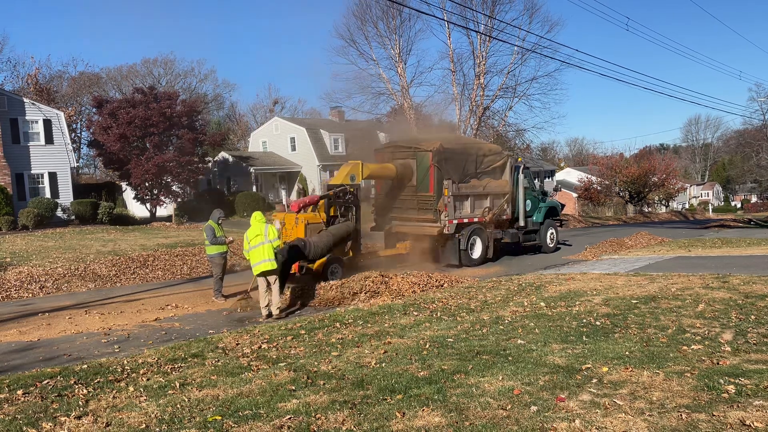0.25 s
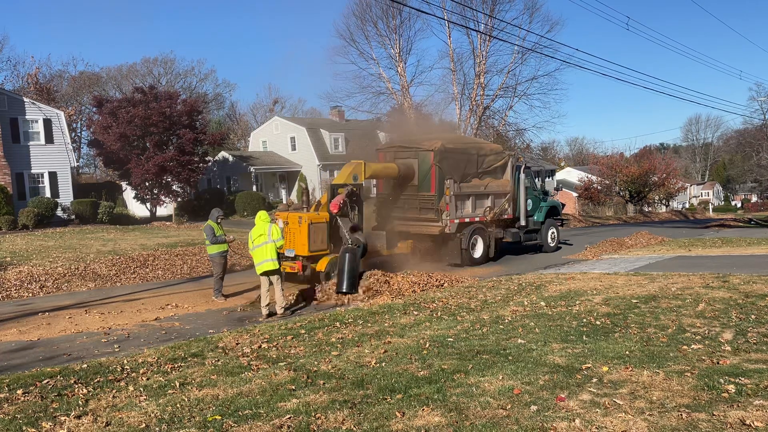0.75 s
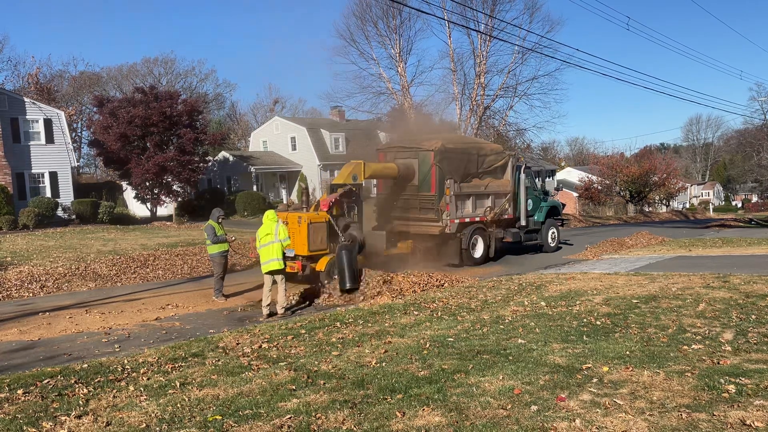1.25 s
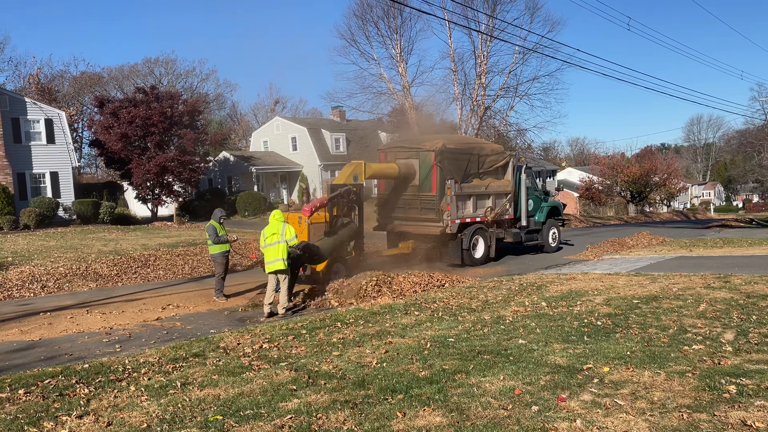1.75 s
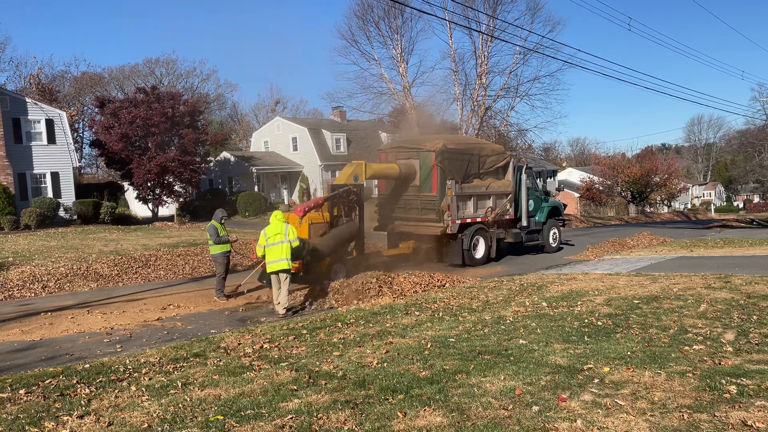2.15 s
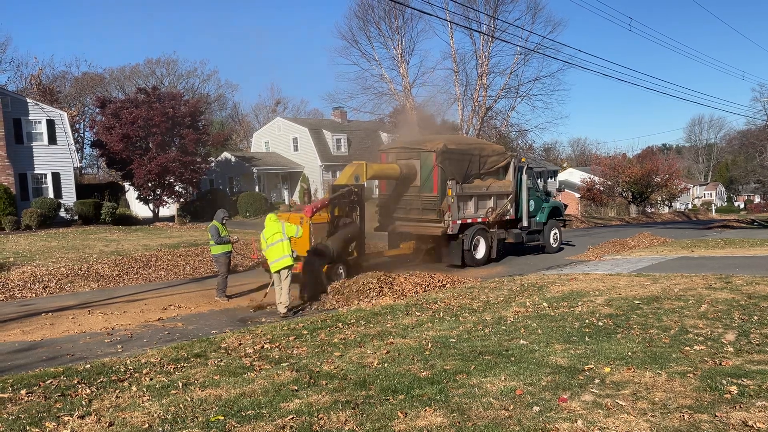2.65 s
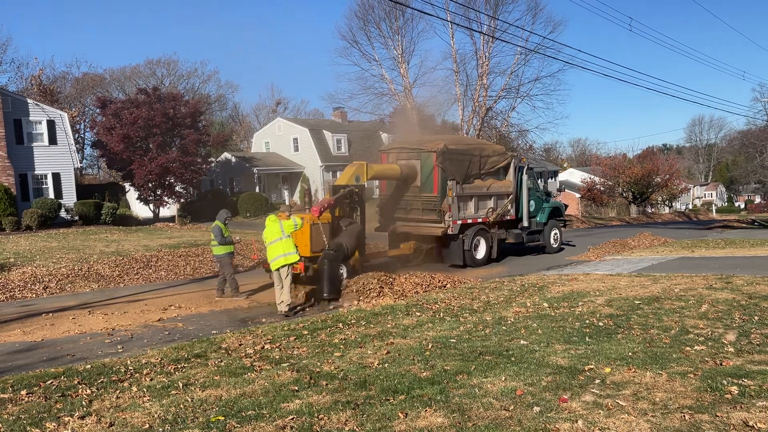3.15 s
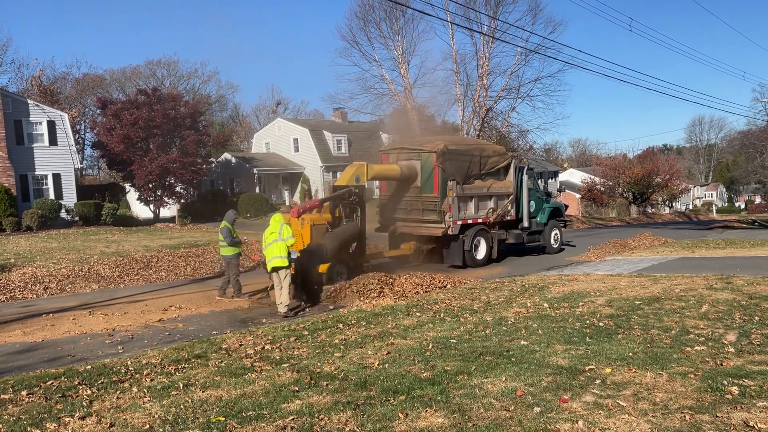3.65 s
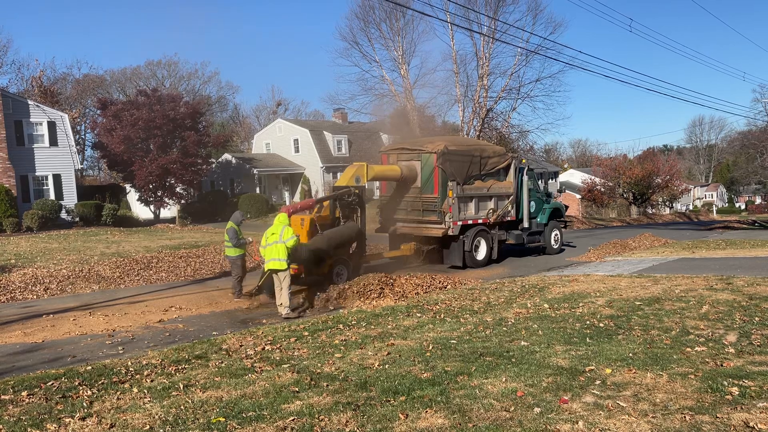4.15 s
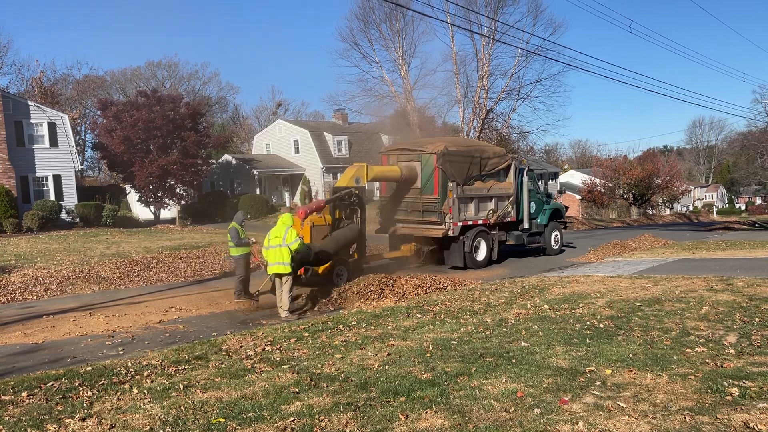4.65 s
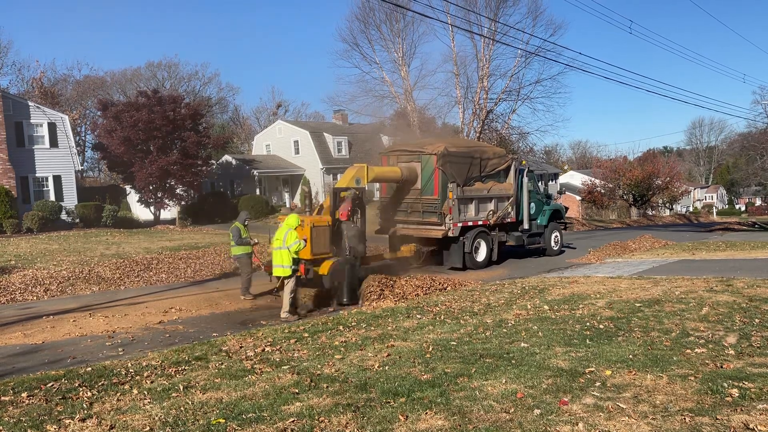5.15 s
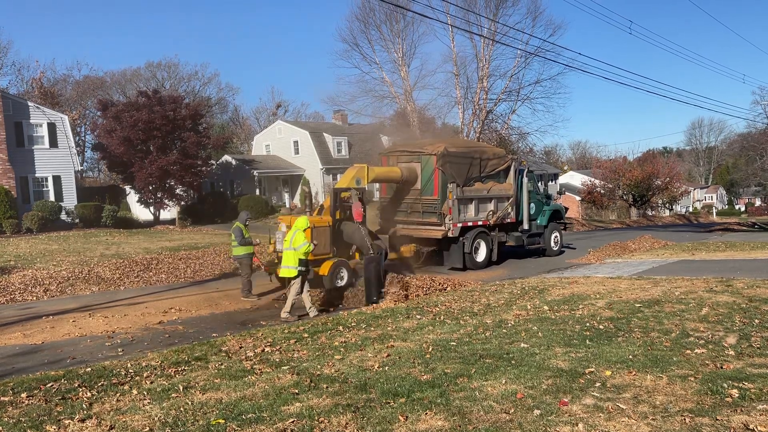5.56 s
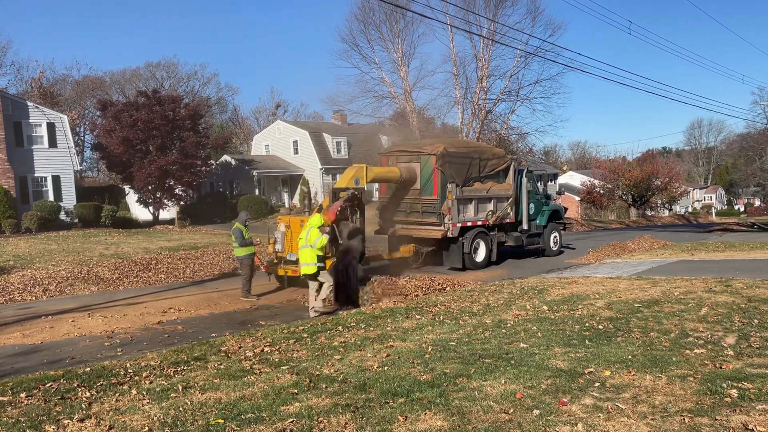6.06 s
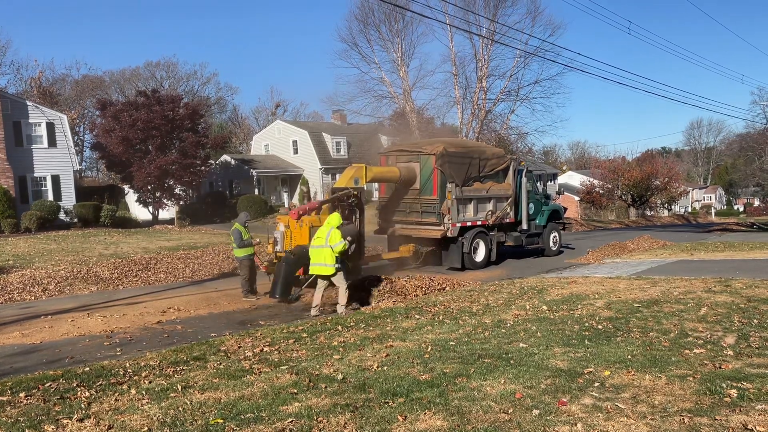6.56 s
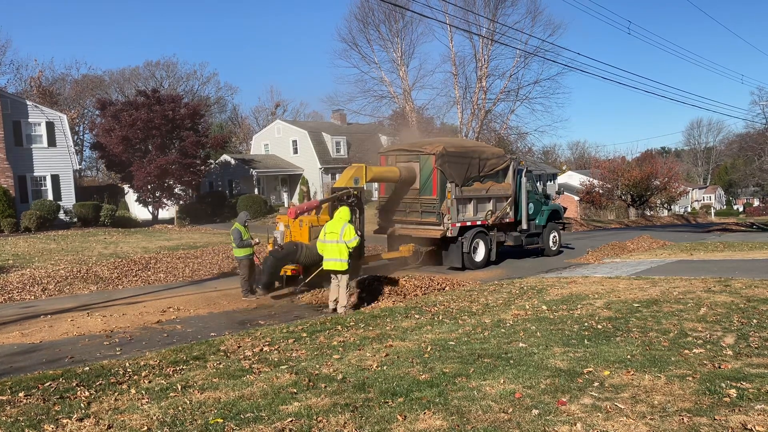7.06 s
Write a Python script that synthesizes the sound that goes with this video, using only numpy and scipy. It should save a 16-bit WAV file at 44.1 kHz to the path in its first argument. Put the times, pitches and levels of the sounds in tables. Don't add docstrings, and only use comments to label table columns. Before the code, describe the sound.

A diesel leaf vacuum runs continuously outdoors, heard across a lawn on an unprotected stereo phone microphone. Its low, buzzing engine hum stays nearly constant, sagging very slightly around 1.3 to 2 seconds and again near 6, beneath a broad, rough fan roar. At 0 to 0.1 seconds a cluster of hard wind slaps strikes the microphone; more thumps follow at 0.3 to 0.5 and around 1.2 to 1.9. Gusts swell again from 2.5 to 3.9, with a heavy slap near 3.3, then the wind mostly settles into low rumble, with thumps near 4.7 and 5.7. Dry leaves rush through the hose with grainy, dusty hiss, fuller around 0.35, 1.65, 2.6, 3.75, 5 and 6.1, thinner near 2.25 and 4.5, fading by 7.1. Twigs tick sharply on metal, busiest at 1.4 to 2 and around 5.9. The roar continues until the end at about 7.3.

```python
import sys
import numpy as np
from scipy import signal
from scipy.fft import rfft, irfft, next_fast_len
from scipy.io import wavfile
from scipy.ndimage import uniform_filter1d, minimum_filter1d

SR = 44100
rng = np.random.default_rng(int(sys.argv[2]) if len(sys.argv) > 2 else 0)


def waveform_to_disk(signal):
    frames = np.transpose(np.atleast_2d(signal))
    scaled = np.clip(frames, -1, 1) * 32767
    samples = np.round(scaled).astype(np.int16)
    wavfile.write(sys.argv[1], SR, samples)


def natural_amplitude(level_db):
    exponent = np.asarray(level_db, float) / 20
    return 10 ** exponent


N = 322371
FAST = next_fast_len(N)
HZ = np.maximum(np.arange(FAST // 2 + 1) * SR / FAST, 1)
TOP_HZ = 15900


def level(x, db):
    return x * natural_amplitude(db) / np.sqrt(np.mean(x ** 2))


def columns(table):
    s, *rest = np.transpose(table)
    return [np.interp(np.arange(N) / SR, s, c) for c in rest]


def on_hz(table):
    f, *rest = np.transpose(table)
    return [np.interp(np.log(HZ), np.log(f), c) for c in rest]


def back(spec):
    return irfft(spec, FAST)[..., :N]


def colour(x, table):
    return back(rfft(x, FAST) * natural_amplitude(on_hz(table)[0]))


def walk(rate):
    hold = int(SR / rate)
    steps = np.repeat(rng.standard_normal(N // hold + 1), hold)
    return 1.15 * uniform_filter1d(uniform_filter1d(steps, hold), hold)[:N]


def restless(x, lo_hz, shared_db, own_db, rate):
    spec, shared, out = rfft(x, FAST), walk(rate), 0
    within = np.clip(HZ, lo_hz, 32 * lo_hz)
    for hz in lo_hz * 2. ** np.arange(6):
        share = np.cos(np.clip(np.log2(within / hz), -1, 1) * np.pi / 2) ** 2
        out = out + back(spec * share) * natural_amplitude(shared_db * shared + own_db * walk(rate))
    return out


def add(out, s, burst):
    i = int(s * SR)
    out[..., i:i + burst.shape[-1]] += burst[..., :N - i]


SLAP_RISE_MS = 5.94
# (time [s], peak level [dB], centre frequency [Hz])
AIR_SLAPS = [(0.004, -4.5, 420), (0.03, -4.5, 500), (0.046, -4.5, 480), (0.066, -7, 594), (0.275, -11, 360),
             (0.365, -11.5, 248), (0.455, -10.5, 340), (0.505, -7, 390), (0.793, -16, 256),
             (1.238, -12.5, 245), (1.397, -10.5, 258), (1.45, -21, 256), (1.472, -7.5, 254),
             (1.577, -11.5, 252), (1.66, -13, 244), (1.901, -13.5, 267), (2.451, -14.5, 288),
             (2.528, -8, 292), (2.639, -15, 278), (2.679, -7, 272), (2.822, -16, 250), (2.998, -9, 356),
             (3.26, -4.5, 327), (3.527, -12, 400), (3.554, -9.5, 415), (3.749, -10, 254), (3.857, -15, 255),
             (4.687, -14.5, 246), (5.694, -10, 270), (5.73, -26, 277)]


def slaps():
    out = np.zeros(N)
    t = np.arange(int(.09 * SR)) / SR
    age = t * 1000 / SLAP_RISE_MS
    for s, db, hz in AIR_SLAPS:
        b, a = signal.butter(2, [hz / 1.38, hz * 1.32], "band", fs=SR)
        eddy = signal.lfilter(b, a, rng.standard_normal(len(t))) * age * np.exp(1 - age)
        add(out, s, natural_amplitude(db) * eddy / np.abs(eddy).max())
    return out


def wake():
    width_s = 0.025
    first_gust_s, first_gust_db = 0.099, -11.5
    t = np.arange(0, N, 64) / SR
    power = natural_amplitude(2 * first_gust_db) * np.clip((first_gust_s - t) / 0.0049, 0, 1)
    for s, db, _ in AIR_SLAPS:
        distance = np.clip((t - s - SLAP_RISE_MS / 1000) / width_s, -9, 9)
        power = power + natural_amplitude(2 * db) * np.exp(-distance ** 2)
    return np.interp(np.arange(N) / SR, t, power)


# (time [s], rumble level [dB])
WIND_GUSTS = [(0, -21), (.5, -18.5), (.9, -19.5), (1.18, -23), (1.45, -18.5), (1.7, -18), (1.85, -22),
              (2.4, -20), (2.9, -15), (3.2, -20.5), (3.75, -16.5), (4.2, -23), (4.8, -21.5), (5.4, -20.5),
              (5.75, -20.5), (6.5, -20.5), (6.76, -24.5), (7.0, -22.5)]
# (frequency [Hz], density [dB per Hz])
RUMBLE_SPECTRUM = [(25, -34), (42, -5), (62, -1), (90, -1), (115, -6), (170, -8), (240, -15), (320, -18),
                   (600, -61.5)]
# (frequency [Hz], density [dB per Hz])
BUFFET_SPECTRUM = [(100, -25), (200, 5.5), (300, -2.5), (480, -3.5), (750, -14), (1000, -19), (1600, -71)]


def wind():
    buffet_under_rumble_db = -8
    wake_rumble_db, wake_buffet_db = -15.5, -11
    gust_db, = columns(WIND_GUSTS)
    near = wake()
    rumble_power = natural_amplitude(2 * gust_db) + near * natural_amplitude(2 * wake_rumble_db)
    buffet_power = natural_amplitude(2 * (gust_db + buffet_under_rumble_db)) + near * natural_amplitude(2 * wake_buffet_db)
    buffet_gain = np.sqrt(np.maximum(buffet_power - natural_amplitude(-26.0) ** 2, 0))
    pair = []
    for _ in range(2):
        rumble = level(colour(rng.standard_normal(N), RUMBLE_SPECTRUM), 1.87)
        rumble = rumble * np.sqrt(rumble_power) * natural_amplitude(2.23 * walk(21))
        buffet = level(colour(rng.standard_normal(N), BUFFET_SPECTRUM), -2.1)
        buffet = buffet * buffet_gain * natural_amplitude(4.9 * walk(40))
        pair.append(rumble + buffet + slaps())
    common = pair[0] * natural_amplitude([[.5], [-.5]])
    opposed = natural_amplitude(-12.5) * pair[1] * np.array([[1], [-1]])
    return common + opposed


# (shaft order, level relative to -18 dB [dB])
SHAFT_ORDERS = [(1, -25), (2, -0.5), (3, -33), (4, 3.5), (5, -55), (6, -13.5), (7, -18), (8, -28), (9, -88),
                (10, -27.5), (11, -26), (12, -24), (14, -67), (15, -50), (17, -35), (18, -20.5), (19, -39),
                (20, -20.5), (21, -32), (22, -25), (23, -27), (24, -26.5)]
# (time [s], shaft speed [turns/s])
SHAFT_SPEED = [(0, 32.4), (.3, 32.33), (.75, 32.22), (1.3, 31.62), (1.7, 31.78), (2.0, 31.68),
               (2.75, 32.33), (3.25, 32.12), (3.75, 32.07), (4.3, 32.17), (4.9, 32.2), (5.3, 32.33),
               (5.6, 32.25), (6.05, 31.74), (6.45, 31.8), (6.9, 32.3), (7.31, 32.22)]
# (time [s], blade passes lost)
IMPELLER_SLIP = [(0, -.45), (.8, 0), (1.5, .5), (2.2, 1.5), (3.45, 2.5), (4.15, 3.5), (5.25, 4), (5.9, 4.5),
                 (6.8, 5.5), (7.31, 5.68)]


def engine():
    speed_wobble, blade_db = .0004, -25.5
    (hz,), (lost,) = columns(SHAFT_SPEED), columns(IMPELLER_SLIP)
    turn = 2 * np.pi * np.cumsum(hz * (1 + speed_wobble * walk(9))) / SR

    def tone(order, db, late=0):
        return np.sqrt(2) * natural_amplitude(db) * np.cos(order * turn - .012 * order ** 2 - late)

    out = tone(6, blade_db, 2 * np.pi * lost)
    for order, db in SHAFT_ORDERS:
        flicker_db = .5 if order in (2, 4, 6) else 1.8
        out = out + tone(order, db - 18.0 + flicker_db * walk(6))
    return out, turn


# (time [s], level [dB])
LEAF_LOAD = [(0, -36), (.09, -52), (.27, -52), (.35, -33), (.55, -38), (1.5, -38.5), (1.65, -33),
             (1.8, -40), (2.25, -47), (2.63, -33), (3.2, -40), (3.75, -35), (4.3, -48), (4.78, -48),
             (4.95, -32.5), (5.6, -37), (6.1, -34.5), (7.1, -52)]
# (frequency [Hz], density [dB per Hz])
FAN_SPECTRUM = [(250, -3.5), (370, -6.5), (470, -10), (630, -0.5), (1000, -10.5), (1450, -4.5), (1750, -11),
                (1950, -6.5), (2300, -15), (2500, -12), (4000, -22), (5300, -30.5), (7000, -32.5),
                (12000, -57)]
# (frequency [Hz], density [dB per Hz])
RUSH_SPECTRUM = [(600, -34), (1300, -8), (2200, -1), (3000, -1.5), (4200, -2), (5300, -7), (6500, -7.5),
                 (9000, -8.5), (12000, -54)]
# (frequency [Hz], density [dB per Hz])
HISS_SPECTRUM = [(3000, -42), (5500, -28.5), (7000, -9), (8500, 6.5), (10000, 0.5), (11500, 1),
                 (13000, -3.5), (14500, 0), (15700, -15)]


def blower(turn):
    hiss_db, = columns(LEAF_LOAD)
    load_db = hiss_db + 36
    roar_db = -27.5 + 0.1047 * load_db
    rush_db = -29.5 + 0.57 * uniform_filter1d(load_db, size=int(2 * .12 * SR))
    chop = 1 + 0.018 * np.cos(2 * turn) + 0.043 * np.cos(turn) + 0.032 * np.cos(3 * turn)
    roar_spectrum = [(70, -53), (170, -3.5)] + FAN_SPECTRUM + [(TOP_HZ, -46)]
    roar = colour(rng.standard_normal((2, N)) * chop, roar_spectrum)
    roar = restless(roar, 440, shared_db=0.0, own_db=0.47, rate=8.2)
    grain_db = rng.exponential(size=N // 40 + 1).repeat(40)[:N]
    grains = rng.standard_normal((2, N)) * natural_amplitude(grain_db)
    rush = restless(colour(grains, RUSH_SPECTRUM), 710, shared_db=-1.0, own_db=2.0, rate=11)
    dust = colour(rng.standard_normal((2, N)), HISS_SPECTRUM)
    hiss = restless(dust, 520, shared_db=-2.0, own_db=1., rate=8)
    loaded = np.sqrt(np.maximum(natural_amplitude(rush_db) ** 2 - natural_amplitude(-39) ** 2, 0))
    return level(roar, 3.46) * natural_amplitude(roar_db) + level(rush, 0.46) * loaded + level(hiss, 0.5) * natural_amplitude(hiss_db)


# (time [s], peak level [dB], relative level of low part [dB])
TWIG_TICKS = [(0.5322, -29, 8), (0.573, -23.5, -1), (0.63, -34, -7), (0.6546, -54, -1), (1.0226, -23.5, 1),
              (1.351, -27, 12), (1.474, -19, -2), (1.5894, -19.5, -3.5), (1.756, -31, 3),
              (1.7748, -25, 10.5), (1.839, -20.5, -1), (1.926, -24, 7), (2.81, -16, -10), (3.049, -23, -7),
              (3.1095, -25, 4), (3.476, -24, 3), (4.002, -22, 1.5), (4.1776, -23, -17), (4.971, -28, -15),
              (5.0559, -28, -15), (2.069, -28, -3), (5.377, -30, -8), (5.432, -28, -5), (5.7335, -24, -6),
              (5.884, -18.5, -3.5), (5.9594, -27, -7), (5.9863, -22, 0.5), (6.0781, -30, -8),
              (6.3674, -32, -7), (6.8927, -26, -10)]


def ticks():
    high, low = np.zeros((2, 2, N))
    t = np.arange(int(.06 * SR)) / SR
    shape = (1 - np.exp(-t / 0.002)) * np.exp(-t / 0.014)
    for s, db, low_db in TWIG_TICKS:
        burst = shape * rng.standard_normal((2, len(t)))
        add(high, s, natural_amplitude(db - 7.0) * burst)
        add(low, s, natural_amplitude(db + low_db + 9.0) * burst)
    bright = colour(high, [(2500, 7), (4500, 10.0), (9000, 7.5), (13000, -24)])
    dull = colour(low, [(700, -4), (1600, -5), (3600, -3.5), (5500, -24)])
    return bright + dull


# (frequency [Hz], right gain [dB], right lead [rad], second path share, unrelated share)
PORT_PAIR = [(50, -1, 0, 0, .1), (430, -1, 0, .1, .4), (650, -6.5, -.4, .85, .55), (1500, -7.5, 0, .75, .6),
             (2200, -4.5, -.2, .3, .5), (3000, -4.5, -.4, .12, .6), (4000, 0, -.2, 0, .3),
             (5300, -3, -1.1, 0, .9), (6000, -4, .2, 0, .8), (7600, -.5, 2.7, 0, .55),
             (8900, 0, 3.7, 0, .5), (10300, .5, 5.5, 0, .6), (12600, 0, 6.7, 0, .5), (13800, 0, 9.0, 0, .5),
             (15900, 0, 9.8, 0, .5)]
CANCELLATIONS = [0, 770, 1540, 2200, 2780, 3400, 4000]


def ports(drone, noise):
    gain_db, lead, second, apart = on_hz(PORT_PAIR)
    cycles = np.interp(HZ, CANCELLATIONS, np.arange(len(CANCELLATIONS)))
    two_paths = 1 - second * np.exp(-2j * np.pi * cycles)
    left, scattered = rfft(drone + noise[0], FAST), rfft(noise[1], FAST)
    related = np.sqrt(1 - apart ** 2) * two_paths * np.exp(1j * lead) * left
    right = natural_amplitude(gain_db) * (related + apart * scattered)
    return back(np.array([left, right]) * (HZ < TOP_HZ))


def scene():
    duck_s, duck_db = .5, -11
    air = wind()
    drone, turn = engine()
    machine = ports(drone, blower(turn) + ticks())
    strength = uniform_filter1d(air[0] ** 2, size=int(duck_s * SR))
    return (machine + air) / np.sqrt(1 + strength / natural_amplitude(2 * duck_db)) * natural_amplitude(2.0)


# (low edge [Hz], high edge [Hz], share of time blocks kept)
EDGE_BANDS = [(7250, 7500, .93), (7500, 7700, .75), (8000, 8800, .06), (8800, 9200, .75), (9200, 9600, .92),
              (12900, 13300, .9), (13300, 13750, .55), (13750, 14100, .06), (14100, 15900, .015)]


def ragged(spec):
    out = 0
    for lo, hi, share in EDGE_BANDS:
        chance = uniform_filter1d(rng.standard_normal(N // 1024 + 2), size=2)
        kept = 1. * (chance < np.quantile(chance, share))
        gate = uniform_filter1d(np.roll(kept.repeat(1024), 751)[:N], size=700)
        out = out + back(spec * (HZ >= lo) * (HZ <= hi)) * gate
    return out


def roll_off(x):
    return signal.sosfilt(signal.butter(12, 15900, fs=SR, output="sos"), x)


# (low edge [Hz], high edge [Hz])
SUM_GAPS = [(7250, 9600), (12900, 22050)]
# (low edge [Hz], high edge [Hz])
DIFFERENCE_GAPS = [(10400, 13000)]


def record(dry):
    dry = signal.sosfilt(signal.butter(3, 40, "high", fs=SR, output="sos"), dry)
    peak = uniform_filter1d(-minimum_filter1d(-np.abs(dry).max(axis=0), size=2400), size=1200)
    left, right = rfft(dry * np.minimum(1, .9 / peak) ** .9, FAST)
    middle, side = (left + right) / 2, (left - right) / 2
    both = middle * np.prod([(HZ < lo) | (HZ > hi) for lo, hi in SUM_GAPS], axis=0)
    apart = side * np.prod([(HZ < lo) | (HZ > hi) for lo, hi in DIFFERENCE_GAPS], axis=0)
    mix = back(np.array([both + apart, both - apart])) + ragged(middle)
    return roll_off(mix)


dry = scene()
out = record(dry)
waveform_to_disk(out)
```